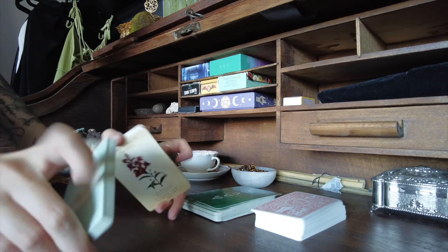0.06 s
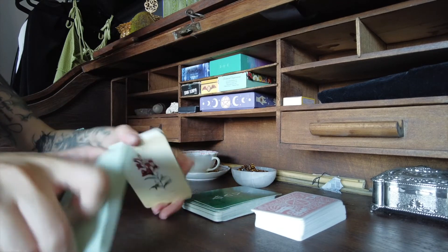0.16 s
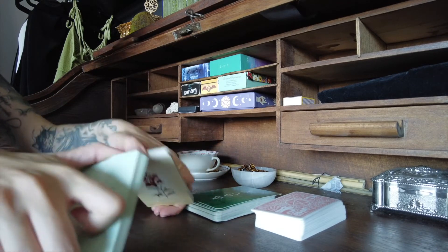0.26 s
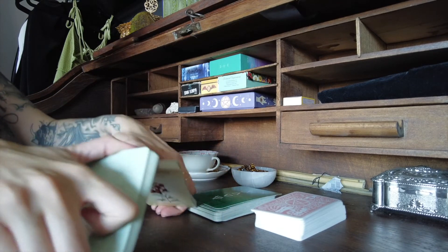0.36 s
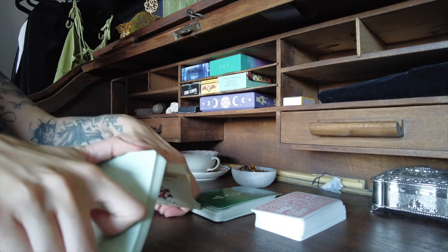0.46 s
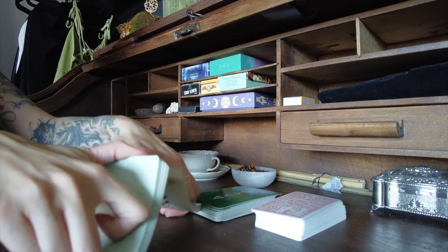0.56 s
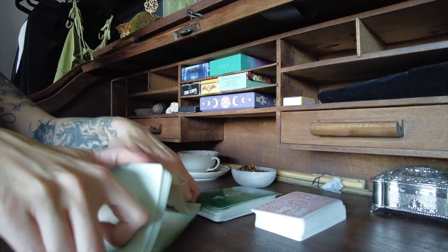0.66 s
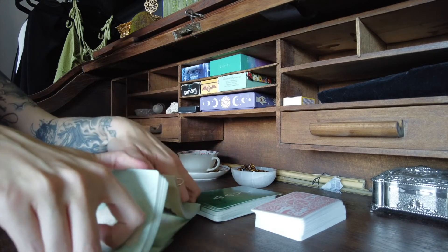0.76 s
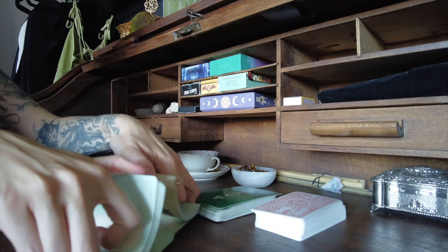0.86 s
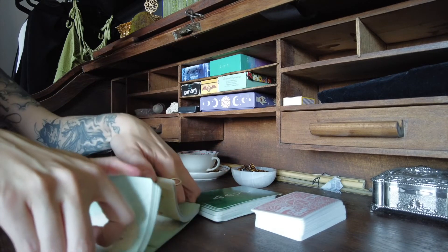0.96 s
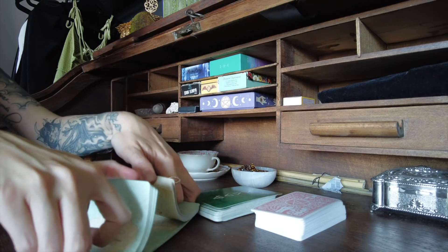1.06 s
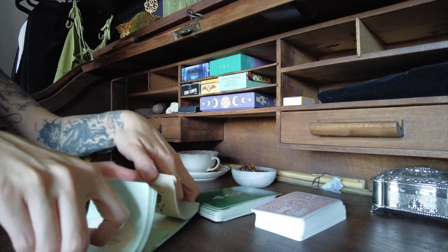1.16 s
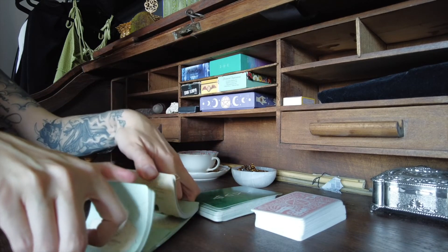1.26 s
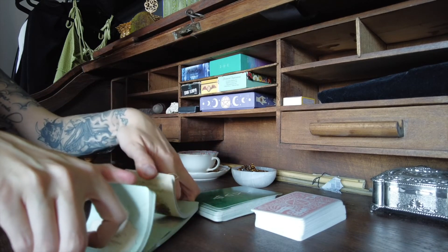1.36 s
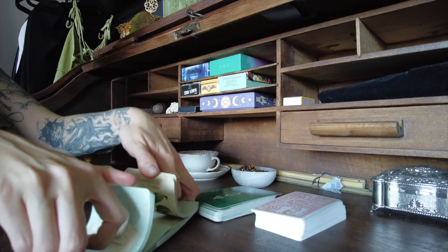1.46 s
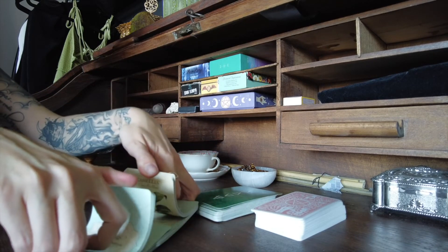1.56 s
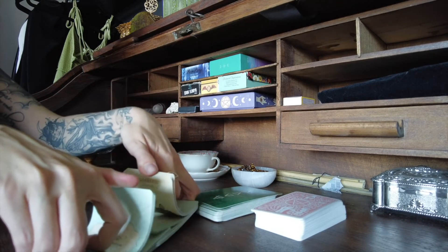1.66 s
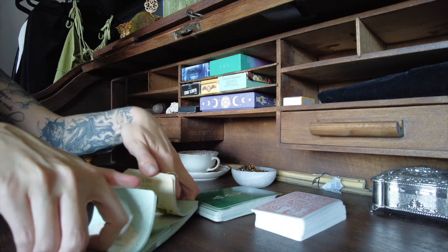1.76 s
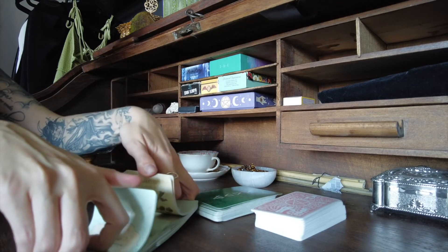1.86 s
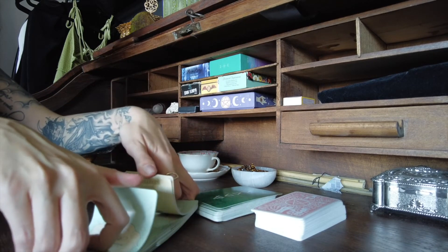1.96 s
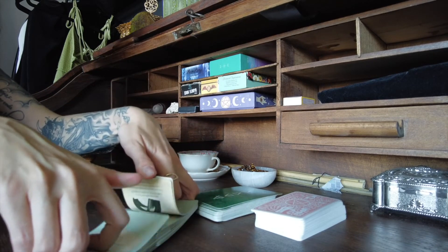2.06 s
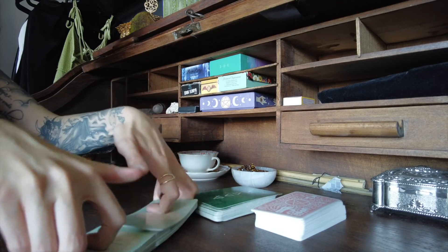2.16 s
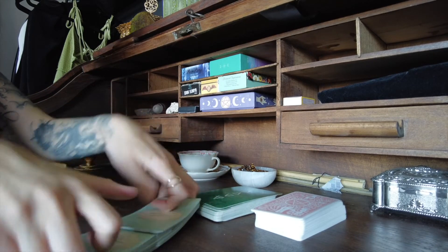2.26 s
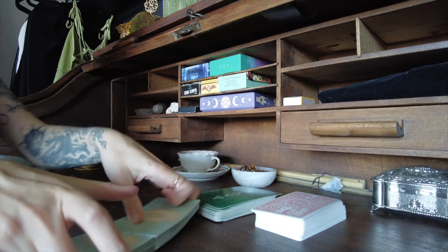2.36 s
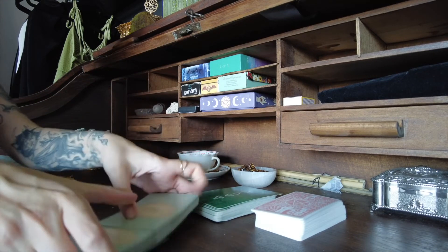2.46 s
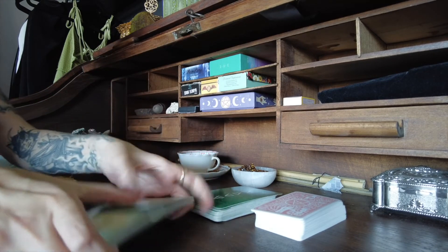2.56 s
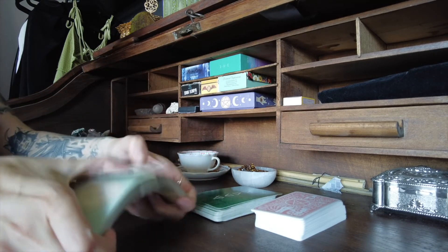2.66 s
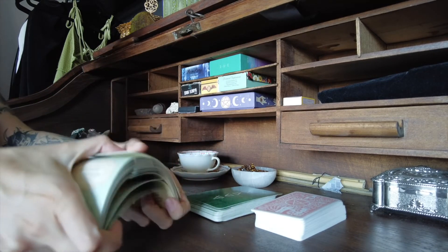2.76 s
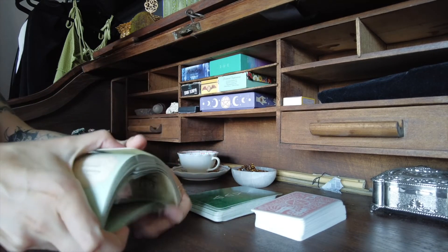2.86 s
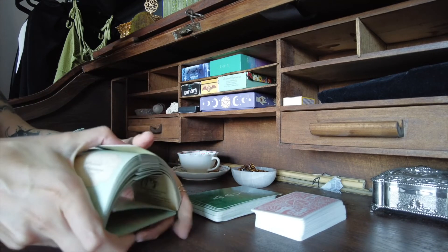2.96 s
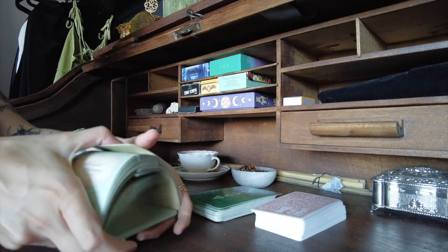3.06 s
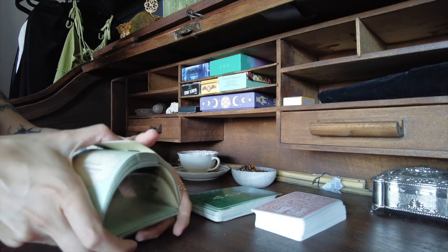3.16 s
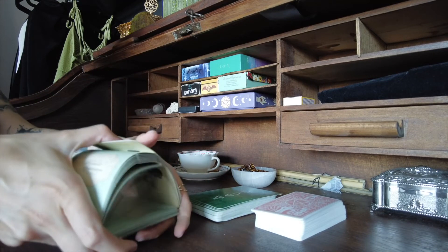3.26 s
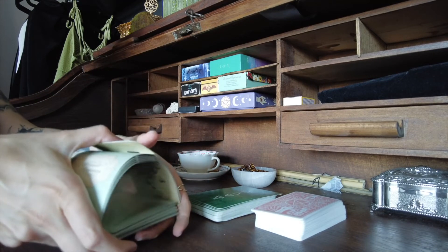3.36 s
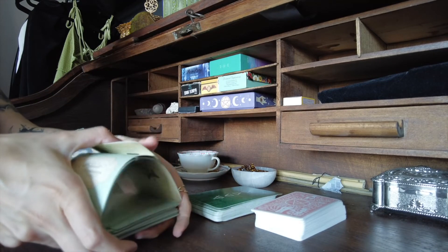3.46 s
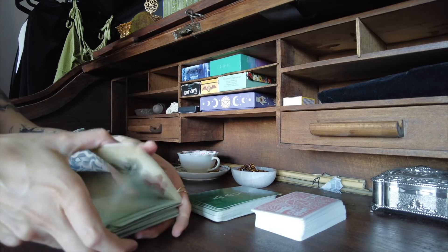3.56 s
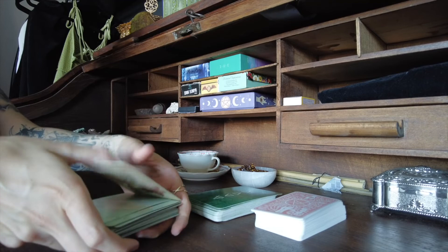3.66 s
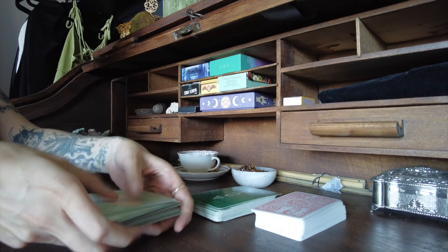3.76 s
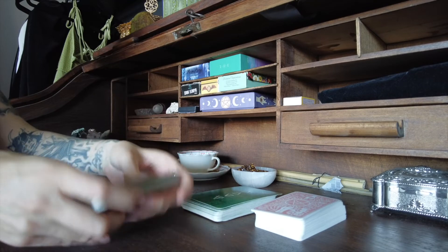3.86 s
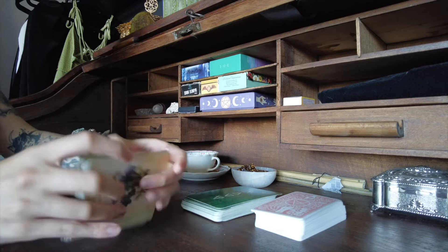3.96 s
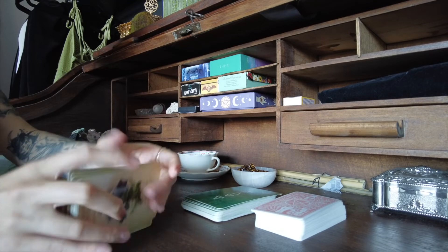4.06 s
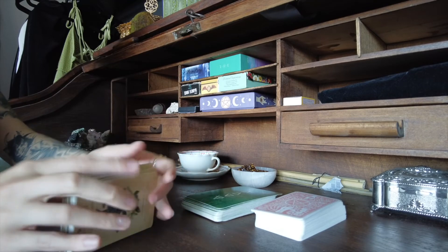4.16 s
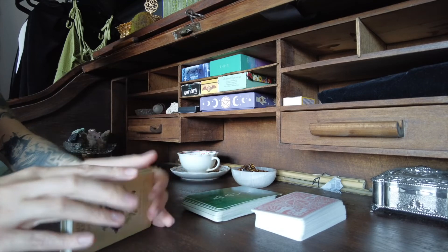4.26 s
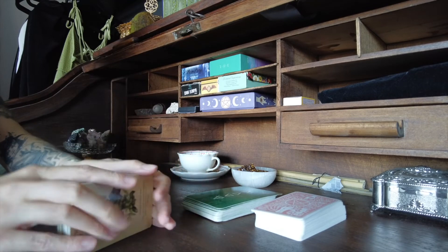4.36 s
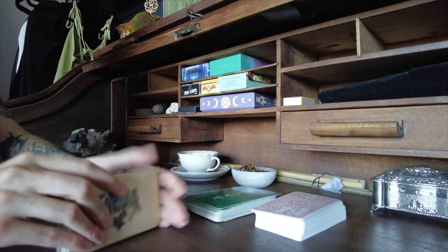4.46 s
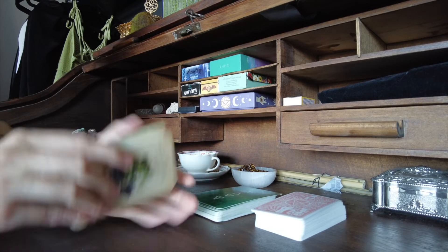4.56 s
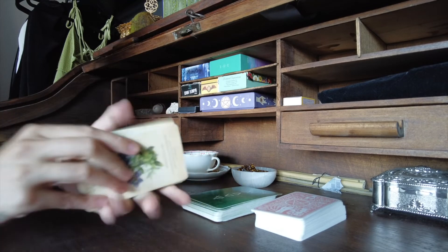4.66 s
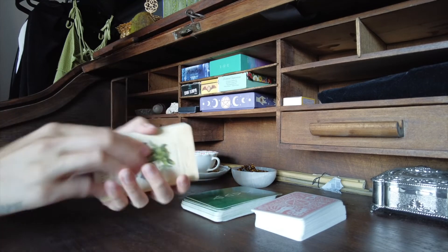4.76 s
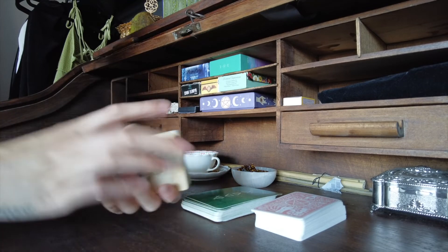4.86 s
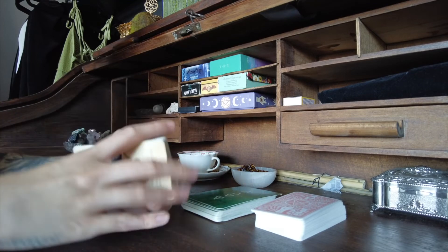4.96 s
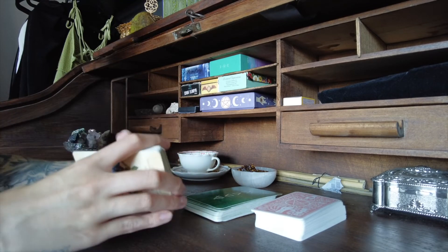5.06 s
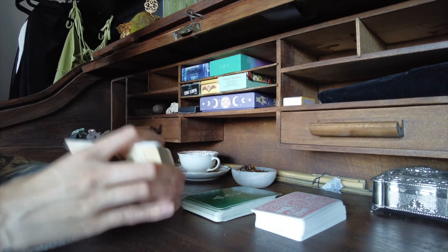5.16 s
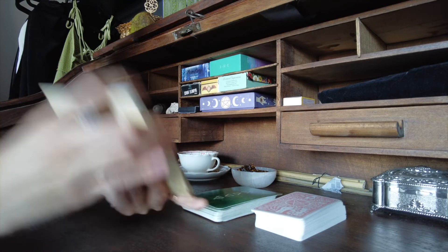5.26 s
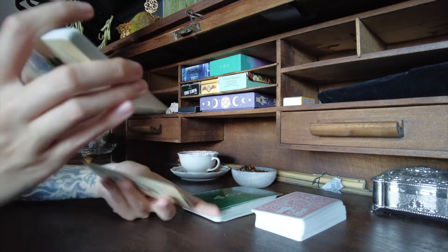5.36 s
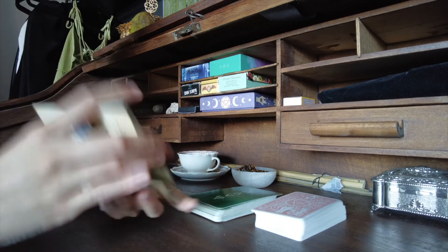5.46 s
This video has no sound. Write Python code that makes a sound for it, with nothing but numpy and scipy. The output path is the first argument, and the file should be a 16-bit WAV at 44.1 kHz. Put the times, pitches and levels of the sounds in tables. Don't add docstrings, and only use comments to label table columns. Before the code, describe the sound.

A deck of stiff cards is shuffled very close to the microphone on a hollow wooden desk in a small, softly reflecting room with faint low noise. The first 0.6 s is nearly quiet, with slight hand bumps. From 0.6 to 2.1 s the riffle runs: irregular dry snaps, sparse at first, then denser, louder and brighter as the halves thin, each with a papery hollow ring and a low thump; the loudest clip. A woody slap ends it around 2.13 s. Until 3 s there are small thuds, faint ticks and brief soft slides as the pack is gripped. From 3.05 to 3.6 s cards cascade from an arch in a fast flutter with bright hiss and rustle, its hollow tone sinking. After a lull, duller knocks, scrapes and wooden taps cluster at 4.0-4.45 s. Near quiet follows, with tiny clicks, then a sharper ringing clack with a thump at 5.3 s and faint ticks at 5.5 s.

```python
import sys
import numpy as np
from scipy import signal
from scipy.fft import rfft, irfft, next_fast_len
from scipy.io import wavfile
from scipy.ndimage import map_coordinates

SR = 44100
rng = np.random.default_rng(int(sys.argv[2]) if len(sys.argv) > 2 else 0)


def master_out(mix):
    frames = np.transpose(np.atleast_2d(mix))
    ceiling = np.clip(frames, -1, 1)
    pcm = np.round(ceiling * 32767).astype(np.int16)
    wavfile.write(sys.argv[1], SR, pcm)


def ratio(d):
    e = np.asarray(d, float) / 20
    return 10 ** e


N = 243431

# start_s, peak_db, brightness_db_per_octave, flap_db
RIFFLE_THICK = [(0.623, -22.5, 0.5, -16.5), (0.6403, -27.5, -0.5, -5.5), (0.6574, 0, 1.5, -21),
                (0.7321, -15.5, -2.5, -22), (0.7868, -23.5, -1.5, -21), (0.816, -33, -1.2, 6),
                (0.834, -2.5, 1.5, -10.5), (0.8579, -12, -12, -13), (0.892, -19.5, -1, -7),
                (0.913, -5, -1, -17), (0.9265, -5, -3.5, -13.5), (0.9491, -5, 4.5, -22.5),
                (0.9561, 4, -8, -32.5), (1.01, -19, -2, -10.5), (1.023, 2.2, -0.5, -28),
                (1.068, -18.5, 1, -21.5), (1.078, -1, -3, -25.5), (1.0966, -3, -1.5, -44.5),
                (1.12, -20, -5, -20), (1.1371, -8, -0.5, -28.5), (1.1633, 4, -3, -43.5),
                (1.2044, -12, -0.5, -23.5), (1.2152, -3.5, -5, -22), (1.2381, 0, 2.5, -20.5),
                (1.259, 4, -5, -45), (1.3052, -1.2, 1, -27), (1.318, -12, -12.5, -17.5),
                (1.3565, 7, -3, -33), (1.3988, 3, 1.5, -14), (1.409, 5.5, -11, -29), (1.426, 10, 3, -20),
                (1.4323, 0.5, -13, -22.5), (1.4455, 3.5, -3, -26.5)]
THICK_POCKETS = [2860, 1500, 1480, 2200, 2200, 1750, 1500, 1613, 2200, 1760, 2195, 1607, 1500, 1850, 1752,
                 1603, 1397, 1740, 1440, 1540, 2300, 1393, 1710, 1776, 1390, 1727, 1606, 1740, 1490, 1700,
                 1518, 1800, 1670]
# start_s, peak_db, brightness_db_per_octave, ring_db, flap_db
RIFFLE_THIN = [(1.5289, -15, 0, -33, -13), (1.539, -5, -10, -30, -25.5), (1.61, -10.5, 0, -25, -15.5),
               (1.6203, 4, 3.5, -39, -13), (1.6917, 4.5, -2.5, -14, -29), (1.722, 5, 3.5, 3, -16.5),
               (1.766, 7.5, 2.5, -0.5, -17.5), (1.8438, 5.5, -2.5, -30, -33.5),
               (1.8784, 11.5, 3, -4.5, -42.5), (1.901, -5, -1, -8, -11), (1.9158, 8, -1, -33, -25.5),
               (1.9716, -9.5, 3, -16.5, -1.5), (1.9795, 7, -0.5, -5, -36), (2.0108, 9, -0.5, 2, -27),
               (2.018, -6.5, 4, -18, -18), (2.0305, 7.5, -0.5, 2.5, -22.5), (2.049, 6.5, 1.8, -1, -11),
               (2.0546, -1.5, -5.5, -1, -21), (2.1077, -8.5, -4.5, -23.5, -5.5),
               (2.1159, 4.5, 1.9, -21, -12.5), (2.12, 4, -7, -12, -26.5), (2.1275, -8, -13.5, -19.5, -15.5)]
# pitch_hz, width_hz, level_db
THIN_OVERTONE = (6130, 1100, -4)
# start_s, peak_db, brightness_db_per_octave, ring_db
ARCH_DROPS = [(3.1, -14, -5, -10.5), (3.1338, -3.5, 5.5, 2.5), (3.153, -8, -4.5, -5), (3.1955, -7, 6, 7),
              (3.2896, -8, 1.5, 9.5), (3.3209, -7.5, -11.5, -10), (3.34, 4.5, 2, -4), (3.387, 2, -4, -20),
              (3.4249, -2, 1, 13), (3.4613, 3, -1, -1), (3.498, -1.5, 0, 2), (3.5343, -3.5, -2.5, 8),
              (3.56, -10, 3.5, -13.5), (3.5782, -14, -6.5, -19.5)]
# start_s, peak_db, brightness_db_per_octave, ring_db
LIGHT_DROPS = [(3.124, -15.5, -5, 0.5), (3.209, -10.5, 1, 11.5), (3.226, -19.5, -1, 14.5),
               (3.264, -28.5, 4.5, 4.5), (3.280, -18.5, -0.5, 3), (3.302, -10, -6.5, 4),
               (3.307, -12, -1.5, -6), (3.325, -20.5, -2, -4), (3.351, -12.5, -4.5, 10.5),
               (3.365, -25.5, -7, 3), (3.391, -14.5, 3, -12.5)]
# centre_hz, width_hz, level_db
ARCH_COLOUR = [(400, 300, -6), (1000, 170, 4), (2200, 310, -6), (3100, 320, 5), ]
# start_s, peak_db, brightness_db_per_octave, ring_db, scuff_db
KNOCKS = [(.079, -37.5, -15, 1, -16), (.168, -47.5, -16.5, -1.5, 9), (2.249, -34.5, -19, 7, -7.5),
          (2.279, -48, -37.5, -11.5, 19.5), (2.295, -35, -21, 3.5, -6), (2.39, -45, -16, 7.5, 3.5),
          (2.574, -45, -2, 3.5, -1), (3.803, -46.5, -10, 7.5, -3), (3.9936, -19.5, -19, -1, 3),
          (4.005, -16.5, -21, 2, -10.5), (4.027, -19.5, -28, 2, -13), (4.0495, -10, -9, -16, -20.5),
          (4.054, -9, -11, -14.5, -19.5), (4.058, -13, -15.5, 2.5, -13.5), (4.064, -17, -13, -9, -12.5),
          (4.107, -22, -13.5, -8.5, -8), (4.188, -12.5, -11, -25, -18.5), (4.197, -19.5, -20.5, -8.5, -4),
          (4.321, -25.5, -17.5, 3, -13.5), (4.424, -20, -12, -3.5, -31), (5.281, -35, 11, 27, 3.5),
          (5.315, -8, 0.5, 17.5, -22.5), (5.468, -31.5, 3.5, 14, -16.5)]
# start_s, peak_db, brightness_db_per_octave, scuff_db
TICKS = [(2.47, -43, 0.5, 7.5), (2.751, -35.5, -10.5, 3), (3.899, -46.5, 4, 4.5), (3.963, -37, 0, -2.5),
         (4.126, -20.5, -16.5, -12.5), (4.4015, -37.5, -2, -6.5), (4.4075, -22, 0.5, -14),
         (4.696, -34.5, -0.5, -9.5), (5.051, -34.5, -1.5, -20), (5.0562, -23, -2.5, -22),
         (2.97, -45, -7, -11), (2.854, -35, -5.5, -12.5), (5.501, -26, -1.5, -30), (5.514, -27.5, -10, 1)]
# pitch_hz, width_hz, level_db
PACK_MODES = [(728, 76, -1), (1480, 110, -2.5), (1925, 310, -3.5), (2910, 450, 4), (4270, 250, 7.5)]
# start_s, peak_db, brightness_db_per_octave, pocket_hz, ring_db
FLUTTER = [(1.344, -17.5, 1.5, 1700, -12), (1.556, -23, 0, 2980, -16), (1.7262, -7.5, -1.5, 3100, -10),
           (1.757, -12, 1, 3100, -6.5), (1.8346, -12, -2.5, 3100, -11), (1.904, -8.5, 2, 3100, -13),
           (2.237, -28.5, 0, 1515, -10), (2.707, -36, -5, 1496, -11), (2.832, -29, -1.5, 2460, 1),
           (2.847, -26, -6, 1504, 1.5), (2.986, -33.5, -4, 1736, -4.5), (3.027, -35, -8, 1700, 0.5),
           (3.047, -31, -3, 1705, 6), (3.06, -29.5, -3, 1750, 3), (3.079, -26.5, -0.5, 1750, 4.5),
           (3.115, -20.5, -1, 1760, 5.5), (3.142, -14, -5, 1750, 4.5), (3.164, -22, -2, 1700, 2),
           (3.179, -27, -2.5, 1750, 4.5), (3.235, -18.5, -1, 1734, 9), (3.435, -23.5, -1, 1650, 4),
           (3.47, -20.5, 0.5, 1650, 8.5), (3.508, -19.5, -2, 1605, 7.5), (3.547, -18.5, -2, 1607, 10.5),
           (3.553, -19.5, -1, 1600, 7.5), (4.413, -32, -2.5, 3200, 1.5), (4.432, -26.5, -4.5, 3180, 1),
           (5.105, -39.5, -7, 1590, 4.5), (5.169, -39.5, -7, 1600, 2.5)]
# freq_hz, density_db (per Hz)
SNAP_SPECTRUM = [(240, -2.5), (400, -4), (676, -6), (826, -7.5), (1420, -5.5), (2430, -7), (3160, -5.5),
                 (3690, -8.5), (7510, -8.5), (16000, -12)]

# start_s, peak_db, push_hz
LANDINGS = [(0.8336, -25.5, 191.6), (0.863, -20.5, 149), (0.9265, -15.5, 309.5), (0.9523, -12, 205.5),
            (1.024, -10, 239), (1.0776, -9, 224), (1.0983, -27.5, 308.4), (1.1648, -15.5, 222),
            (1.2154, -9.5, 244), (1.242, -17.5, 282), (1.2619, -11.5, 259), (1.3188, -15, 255),
            (1.3566, -7.5, 240.5), (1.4118, -15.5, 258.5), (1.4445, -13, 190), (1.4643, -15, 104),
            (1.5427, -10, 173), (1.6291, -12.5, 178.7), (1.6956, -11.5, 219), (1.7271, -16, 211),
            (1.778, -20.5, 102), (1.849, -12, 242), (1.9165, -13, 156), (1.982, -15, 190.6),
            (2.0217, -16, 184.6), (2.0626, -13.5, 78)]
# start_s, peak_db, push_hz, boom_db
HANDS = [(0.086, -36, 95, -11.5), (0.1934, -28, 60, -13.5), (0.294, -30, 45.6, -20),
         (0.4287, -33.5, 263, 5), (0.4466, -35, 72, -28), (2.1217, -25, 269, 20), (2.1242, -20, 321, 0.5),
         (2.14, -19.5, 330, 11.5), (2.126, -13.5, 331.6, -10.5), (2.159, -16, 224, -4),
         (2.245, -22, 128, -17.5), (2.344, -20.5, 90, -3), (2.43, -31.5, 83.4, -22.5),
         (2.583, -34.5, 300, 12), (2.698, -31.5, 387, 13.5), (2.711, -32, 330, 12.5),
         (2.757, -30.5, 346, 11), (2.775, -20, 131, -13), (2.799, -32, 136, 6.5),
         (2.891, -21.5, 96.6, -1.5), (3.744, -35.5, 159.6, -16), (3.815, -29, 193, -4.5),
         (4.008, -36, 277, -5), (4.0266, -27.5, 356, 7.5), (4.425, -36, 159, 0.5), (4.4444, -24.5, 271, 1),
         (5.1021, -36.5, 157, 8.5), (5.137, -37.5, 158, -13.5), (5.3172, -18, 237, 2), (5.345, -13, 205, 3),
         (5.5189, -31, 204, -16)]
# start_s, peak_db, pull_hz
PULLS = [
    (2.129, -12, 190),
    (2.339, -20, 60),
    (2.781, -26, 80),
    (2.896, -26, 70),
    (5.351, -20, 80),
]
# pitch_hz, width_hz, level_db
DESK_MODES = [(56, 31, -23), (120.2, 5.3, 4), (209, 8, -11), (242, 35, -2.5), (348, 15, -4.5)]
# start_s, peak_db, ring_hz, t60_s
TAPS = [(2.122, -12.5, 485, 0.077), (2.131, -16, 386, 0.08), (2.28, -36.5, 603, .04),
        (2.301, -39, 810, 0.036), (2.548, -45, 450, .04), (2.581, -38.5, 330, 0.054),
        (2.697, -34, 321, 0.21), (2.707, -31, 414, 0.054), (2.986, -34, 400, 0.026),
        (3.024, -38.5, 500, 0.022), (3.995, -23, 568, 0.045), (4.006, -23, 560, 0.033),
        (4.028, -22.5, 610, 0.028), (4.19, -22, 785, 0.076), (4.407, -33, 400, .06),
        (4.429, -30, 335, 0.064)]

# time_s, level_db
RUBBING = [
    (.6, -72),
    (.84, -53.5),
    (1.05, -44.5),
    (1.3, -38.5),
    (1.6, -52.5),
    (1.82, -31),
    (2.0, -38.5),
    (2.17, -38),
    (2.4, -68),
]
# start_s, held_s, faces_db, edges_db, slope_db_per_s (swell and fade)
STROKES = [(2.485, 0.036, -52, -48.5, 108), (2.696, 0.12, -39, -44, 396), (2.752, 0, -28.5, -48.5, 498),
           (2.84, 0.041, -27.5, -40.5, 414.5), (2.97, 0.18, -49.5, -46.5, 91),
           (2.26, 0.046, -67, -51.5, 300), (3.065, 0.23, -24, -47.5, 650), (3.33, 0.11, -23.5, -46, 200.5),
           (3.451, 0.12, -22.5, -31, 404), (3.121, .45, -44, -29, 500), (3.62, 0.12, -58, -53, 149),
           (4.01, .11, -75, -33, 407.5), (4.199, 0.15, -59.5, -42.5, 299), (4.412, 0.0059, -53, -34.5, 400),
           (4.695, 0.016, -50.5, -63, 302), (4.85, 0, -59.5, -70.5, 54), (5.31, 0, -42.5, -47.5, 117.5),
           (5.52, 0, -47.5, -63, 124.5)]
# time_s, level_db
WEIGHT = [(0, -40), (.28, -41), (.6, -44), (.9, -31), (1.25, -24.5), (1.6, -29), (2.0, -27), (2.13, -20),
          (2.19, -28), (2.4, -36.5), (2.8, -40.5), (3.0, -35), (3.45, -28.5), (3.62, -47), (3.95, -55.5),
          (4.05, -34.5), (4.45, -33.5), (4.6, -48), (5.25, -43.5), (5.52, -39.5)]
FACE_HISS = [(710, -34), (1200, -48), (1490, -22), (2090, -28.5), (2430, 6), (6100, 6.5), (13600, 6.5),
             (16000, 3)]
EDGE_RUSTLE = [(210, -39), (350, -16), (649, 2), (795, -12.5), (939, 1.5), (1040, -6), (1640, -8),
               (2260, -6.5), (3010, -0.5), (6000, -10.5), (7800, -40.5), (13200, -120)]
PACK_SCRAPE = [(150, -28.5), (250, 4.5), (773, 3), (1110, -18), (1260, -3), (1670, 0.5), (2290, -6),
               (4120, -19), (7000, -53.5), (9100, -69), (15400, -120)]
DESK_RUMBLE = [(12, -41), (20, -7), (70, 2.5), (118, -5.5), (147, -4), (330, -8), (499, -17), (600, -15),
               (780, -44.5), (1320, -120)]

# freq_hz, t60_s
ROOM_DECAY = [(200, 0.12), (1500, 0.21), (6000, 0.26), (14000, 0.012)]
# freq_hz, density_db (per Hz)
QUIET = [(12, -34), (20, 14), (68, 5), (158, -22.5), (319, -20.5), (1030, -20.5), (1440, -22),
         (2530, -27.5), (3160, -29), (8000, -35.5), (14300, -44.5), (16000, -42)]
# freq_hz, likeness (0 to 1)
SIDE_LIKENESS = [(30, .94), (100, .965), (300, .92), (700, .6), (1400, .9), (2500, .45), (12000, .2)]
# freq_hz, phase_radians
LEFT_LEAD = [(430, .1), (1080, 1.8), (1250, .2), (2000, -.3), (3100, 4.2), (4400, 8.8), (5200, 6.4),
             (6100, 8)]
# centre_hz, width_hz, level_db
ECHO_DIPS = [(1073, 92, -3.5)]


def snaps(table, rise_s, crack_t60, body_db, body_t60, flap_t60, chatter_db, pocket_q, corner_hz,
          tail_hz, lead_db, gain_db):
    ahead, t = SR // 100, np.arange(SR // 4) / SR
    out = np.zeros((2, N + SR))
    rise = 1 - np.exp(-(t / rise_s) ** 2)
    crack = rise * ratio(-60 * t / crack_t60)
    softer = signal.butter(1, tail_hz, fs=SR)
    for s, db, bright_db, hz, ring_db, flap_db in table:
        chatter = np.interp(t * 500, np.arange(130), rng.standard_normal(130))
        chatter *= 1 - np.exp(-t / .008)
        flap = ratio(body_db - 60 * t / body_t60) + ratio(flap_db - 60 * t / flap_t60)
        flap = rise * flap * ratio(chatter_db * chatter)
        force = np.pad(crack + flap, (ahead, 0))

        noise = rng.standard_normal((2, len(t)))
        dull = signal.lfilter(*softer, noise)
        grit = unit(dull * np.abs(dull) ** 0.77)
        drive = crack * np.sign(noise) * [[1], [.65]] + flap * grit
        drive[0, round(rise_s * SR)] -= 2.6
        drive[0] += 0.32 * crack * np.sin(2 * np.pi * hz * t)
        creep = ratio(lead_db - 60 * t[:ahead] / 0.0091) * noise[:, -ahead:]

        bend = 1.9 * rng.standard_normal(48)

        def card(f):
            tilt = bright_db * np.log2(1 + (f / corner_hz) ** 2) / 2
            own = np.interp(f / 400, np.arange(len(bend)), bend)
            small = f / np.hypot(f, 300)
            return ratio(along(SNAP_SPECTRUM, f) + own + tilt) * small

        def colour(f):
            octave = ratio(-4.5) * resonance(f, 2 * hz, hz / 5)
            ring = resonance(f, hz, hz / pocket_q) - octave
            return causal(card(f)) + card(hz) * ratio(ring_db + 5) * ring

        sound = stereo(np.c_[creep[:, ::-1], drive], colour) * np.sqrt(np.mean(force ** 2))
        out[:, round(s * SR):][:, :len(force)] += ratio(db + gain_db) * sound
    return out[:, ahead:N + ahead]


def pocket(hz, count):
    return np.asarray(hz) * np.exp(0.0092 * rng.standard_normal(count))


def thick_riffle():
    pockets = pocket(THICK_POCKETS, len(RIFFLE_THICK))
    rows = [(s, db, bright, hz, -9, flap) for (s, db, bright, flap), hz in zip(RIFFLE_THICK, pockets)]
    return snaps(rows, rise_s=0.00033, crack_t60=.007, body_db=-13, body_t60=0.034, flap_t60=0.14,
                 chatter_db=3.5, pocket_q=12, corner_hz=1460, tail_hz=6000, lead_db=-15.5, gain_db=-7.5)


def thin_riffle():
    pockets = pocket(3080, len(RIFFLE_THIN))
    rows = [(s, db, bright, hz, ring, flap)
            for (s, db, bright, ring, flap), hz in zip(RIFFLE_THIN, pockets)]
    thin = snaps(rows, rise_s=0.00054, crack_t60=0.0074, body_db=-12, body_t60=0.028, flap_t60=0.14,
                 chatter_db=4.5, pocket_q=6.5, corner_hz=1460, tail_hz=7000, lead_db=-20.5, gain_db=-7.5)
    hz, width_hz, db = THIN_OVERTONE
    return filtered(thin, lambda f: 1 + ratio(db) * resonance(f, hz, width_hz))


def arch_cascade():
    arch_hz, sag_hz_per_s = 1740, 410
    drops = ARCH_DROPS + LIGHT_DROPS
    first_s = ARCH_DROPS[0][0]
    rows = [(s, db, bright, hz - sag_hz_per_s * (s - first_s), ring, -20.5)
            for (s, db, bright, ring), hz in zip(drops, pocket(arch_hz, len(drops)))]
    cascade = snaps(rows, rise_s=0.0005, crack_t60=0.012, body_db=-11, body_t60=0.038, flap_t60=0.24,
                    chatter_db=4.0, pocket_q=7.6, corner_hz=2505, tail_hz=8000, lead_db=-11, gain_db=-5.5)
    return filtered(cascade, lambda f: bells(ARCH_COLOUR, f))


def squaring():
    pack_hz, tick_hz, tick_ring_db = 635, 1480, -9
    rows = [(s, db, bright, pack_hz, ring, scuff) for s, db, bright, ring, scuff in KNOCKS]
    rows += [(s, db, bright, tick_hz, tick_ring_db, scuff) for s, db, bright, scuff in TICKS]
    pack = snaps(rows, rise_s=0.00072, crack_t60=0.014, body_db=-3.5, body_t60=0.059, flap_t60=0.22,
                 chatter_db=2.5, pocket_q=3.6, corner_hz=2360, tail_hz=9000, lead_db=-14.5, gain_db=-9)
    return filtered(pack, lambda f: 1 + sum(ratio(db) * resonance(f, hz, w) for hz, w, db in PACK_MODES))


def flutter():
    rows = [tuple(row) + (-30,) for row in FLUTTER]
    return snaps(rows, rise_s=0.00045, crack_t60=0.014, body_db=-12.5, body_t60=0.035, flap_t60=0.1,
                 chatter_db=8.5, pocket_q=9, corner_hz=2400, tail_hz=8000, lead_db=-20, gain_db=-4.0)


def thumps():
    landings = [(s, db, hz, -5.5) for s, db, hz in LANDINGS]
    drops = [(s, -22.5 - 0.52 * bright, 240, -2) for s, _, bright, _ in ARCH_DROPS]
    return landings + drops + HANDS


def desk():
    ahead = SR // 40
    t = np.arange(-ahead, SR // 10) / SR
    pushes, blows = np.zeros((2, N + SR))
    for s, db, hz, boom_db in thumps():
        u = 2 * np.pi * hz * t
        slap = np.exp(-np.where(u < 0, u * u, 1.6 * (np.sqrt(1 + u * u) - 1)))
        suction = 0.15 * np.exp(-((u + 5) / 4) ** 2) + 0.12 * np.exp(-((u - 9) / 6) ** 2)
        pushes[round(s * SR):][:len(t)] += ratio(db + 2.0) * (slap - suction)
        blows[round(s * SR):][:len(t)] += ratio(db + boom_db + 10.0) * slap
    for s, db, hz in PULLS:
        pull = np.exp(-(2 * np.pi * hz * t) ** 2 / 2) * np.cos(np.pi * hz * t)
        pushes[round(s * SR):][:len(t)] -= ratio(db) * pull

    def wood(f):
        return sum((-1) ** k * ratio(db) * resonance(f, hz, w) for k, (hz, w, db) in enumerate(DESK_MODES))

    return (pushes + filtered(blows, wood))[ahead:N + ahead]


def taps():
    out, t = np.zeros(N + SR), np.arange(SR // 8) / SR
    for s, db, hz, t60 in TAPS:
        ring = np.sin(2 * np.pi * hz * t) + 0.25 * np.sin(2 * np.pi * 1.6 * hz * t)
        out[round(s * SR):][:len(t)] -= ratio(db - 60 * t / t60) * ring
    return out[:N]


def friction():
    t = np.arange(N) / SR
    rubbing = ratio(curve(RUBBING) + np.c_[[0, -2.5]]) ** 2 * (t < RUBBING[-1][0])
    power = ratio(-72.5) ** 2 + rubbing
    for s, held, faces_db, edges_db, slope in STROKES:
        away = np.maximum(0, np.maximum(s - t, t - s - held))
        power += ratio(np.c_[[faces_db, edges_db]] - slope * away) ** 2
    return np.sqrt(power)


def sliding():
    jerk_db = 1.8 * wobble(45)
    faces, edge = friction()
    hiss = ratio(jerk_db / 3) * rush(FACE_HISS, grain_db=2.0, grain_rate=400)
    closed = np.arange(N) > 3.85 * SR
    rustle = rush(EDGE_RUSTLE, grain_db=3.5, grain_rate=200)
    hollow = unit(filtered(rustle, lambda f: 1 + ratio(8) * resonance(f, hz=1714, width_hz=460)))
    edges = np.where(closed, rush(PACK_SCRAPE, grain_db=2.5, grain_rate=160), hollow)
    rumble = ratio(1.5 * wobble(6)) * rush(DESK_RUMBLE, grain_db=2.5, grain_rate=30)
    weight = ratio(curve(WEIGHT) - 7.5 + np.c_[[-1.2, 1.2]])
    return faces * hiss + edge * ratio(jerk_db) * edges + weight * rumble


def room(x):
    hz, t, z = signal.stft(rng.standard_normal((2, SR // 2)), SR, nperseg=256)
    decay = ratio(-60 * t / along(ROOM_DECAY, hz)[:, None])
    tail = signal.istft(z * decay, SR, nperseg=256)[1]
    tail /= np.linalg.norm(tail[0])
    delayed = np.pad(x, ((0, 0), (200, 0)))
    return signal.fftconvolve(delayed, tail, axes=1)[:, :N]


def quiet():
    return ratio(-45 + np.c_[[-.9, .9]]) * rush(QUIET, grain_db=1.2, grain_rate=8)


def rush(spectrum, grain_db, grain_rate):
    grains = ratio(grain_db * wobble(grain_rate)) * rng.standard_normal((2, N))
    return stereo(grains, lambda hz: ratio(along(spectrum, hz)))


def stereo(pair, response):
    def mid_side(hz):
        turn = np.arccos(np.clip(along(SIDE_LIKENESS, hz), -1, 1)) / 2
        return response(hz) * np.array([np.cos(turn), np.sin(turn)])

    mid, side = filtered(pair, mid_side)
    sides = np.array([mid + side, mid - side])
    return unit(filtered(sides, lambda hz: np.exp(.5j * along(LEFT_LEAD, hz) * [[1], [-1]])))


def resonance(f, hz, width_hz):
    return 1j * f * width_hz / (hz * hz - f * f + 1j * f * width_hz)


def bells(rows, f):
    return ratio(sum(db * np.exp(-((f - hz) / width_hz) ** 2) for hz, width_hz, db in rows))


def causal(gain):
    c = irfft(np.log(gain + 1e-6))
    c[1:len(c) // 2] *= 2
    c[len(c) // 2 + 1:] = 0
    return np.exp(rfft(c))


def filtered(x, response):
    m = next_fast_len(x.shape[-1] + 1536)
    return irfft(rfft(x, m) * response(np.fft.rfftfreq(m, 1 / SR)), m)[..., :x.shape[-1]]


def along(points, hz):
    f, v = np.transpose(points)
    return np.interp(np.log(hz + 1), np.log(f + 1), v)


def curve(rows):
    return np.interp(np.arange(N) / SR, *np.transpose(rows))


def wobble(rate):
    return map_coordinates(rng.standard_normal(int(N * rate / SR) + 4), [np.arange(N) * rate / SR])


def unit(x):
    return x / np.sqrt(np.mean(x ** 2) + 1e-20)


def scene():
    cards = thick_riffle() + thin_riffle() + arch_cascade() + squaring()
    wood = (desk() + taps()) * ratio([[-.6], [.6]])
    near = cards + flutter() + wood + sliding()
    return near + ratio(-13.5) * room(cards) + quiet()


def roll_off(x):
    return signal.sosfilt(signal.butter(12, 16370, fs=SR, output="sos"), x)


def record(dry):
    def microphone(f):
        return bells(ECHO_DIPS, f) * (f > 12) / np.sqrt(1 + (f / 15950) ** 240)

    mix = np.clip(filtered(dry, microphone), -1, 1)
    return roll_off(mix)


dry = scene()
out = record(dry)
master_out(out)
```